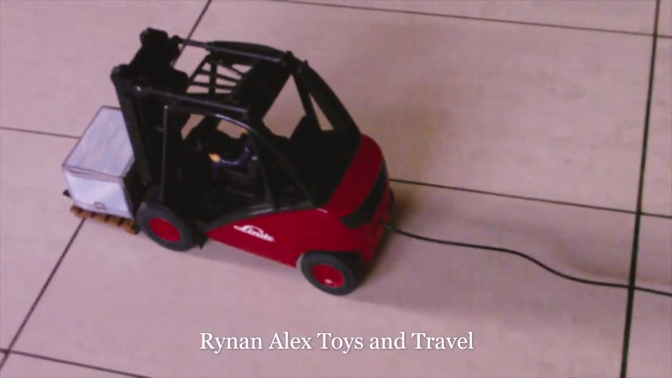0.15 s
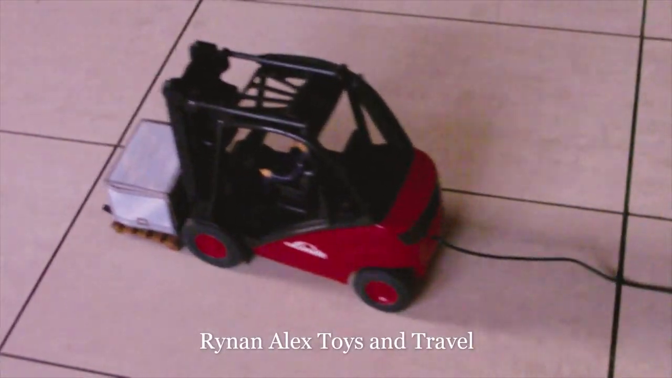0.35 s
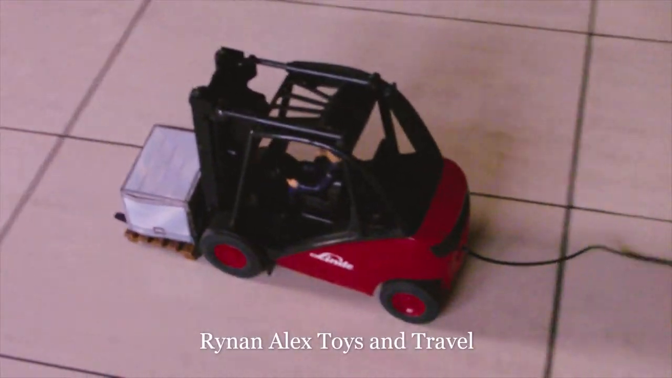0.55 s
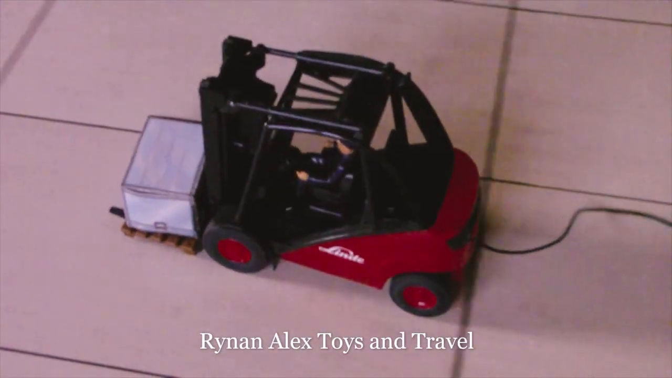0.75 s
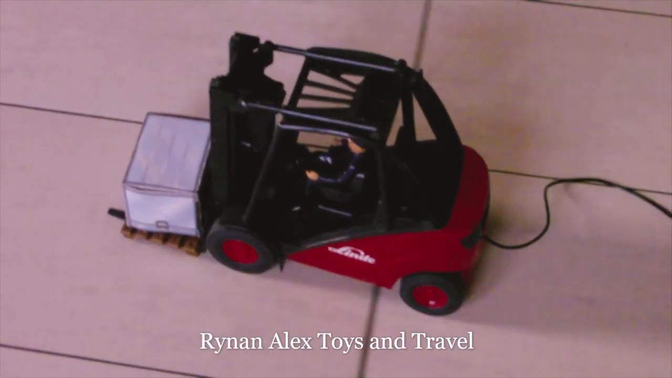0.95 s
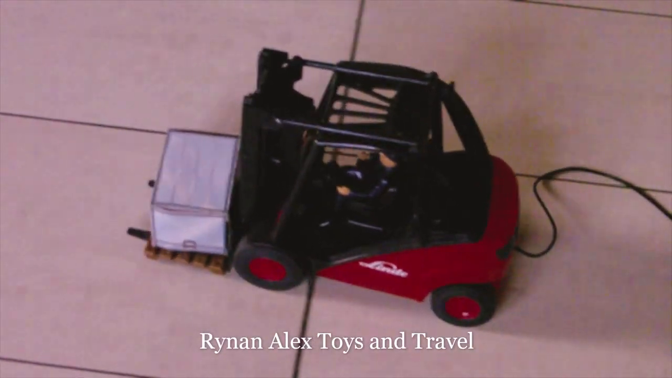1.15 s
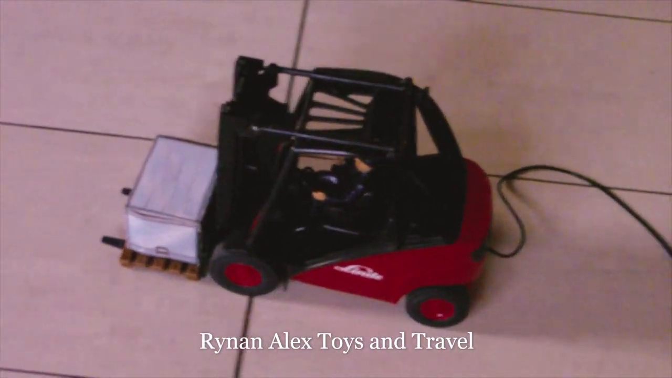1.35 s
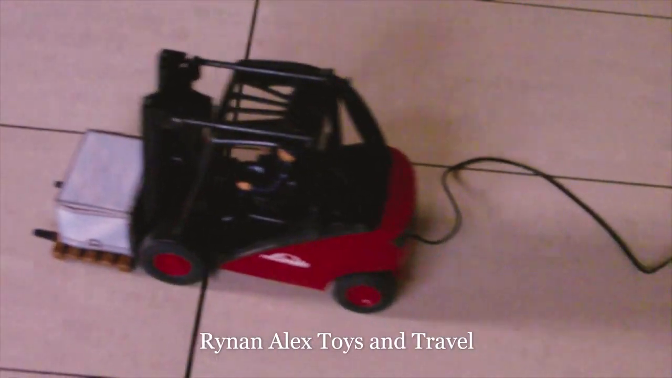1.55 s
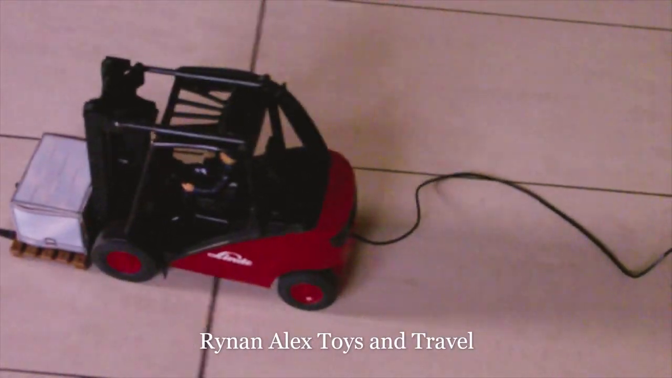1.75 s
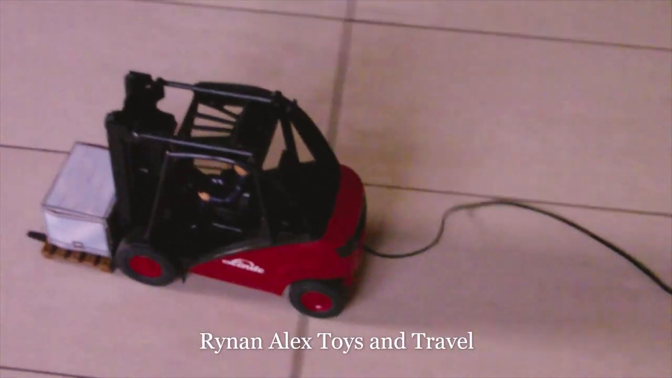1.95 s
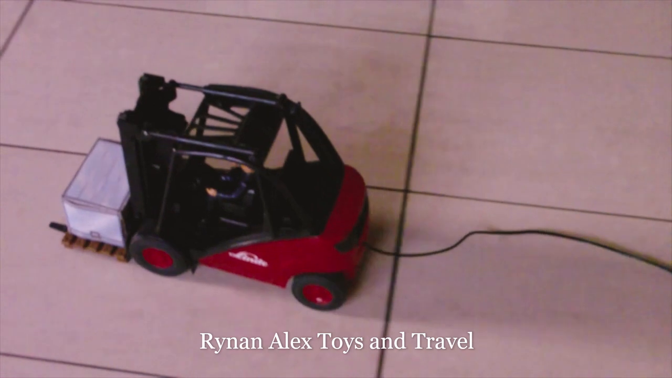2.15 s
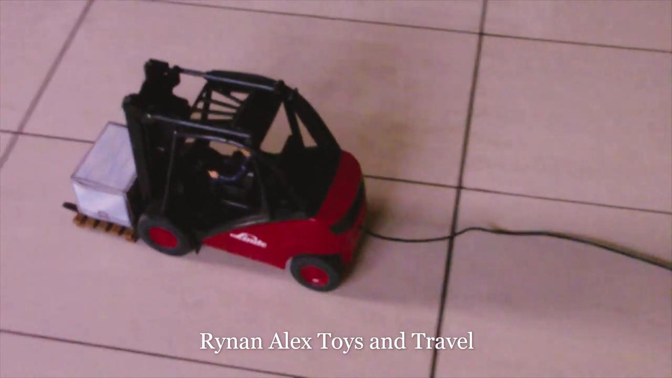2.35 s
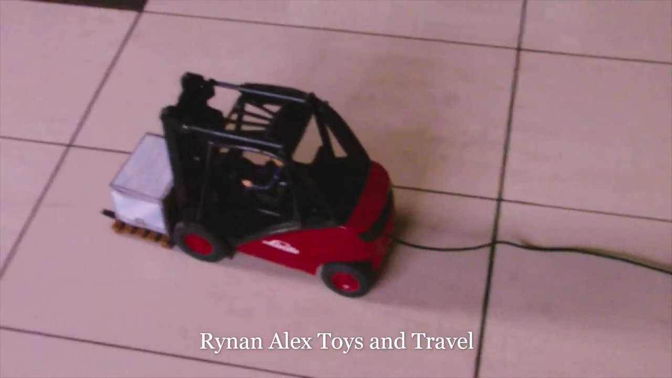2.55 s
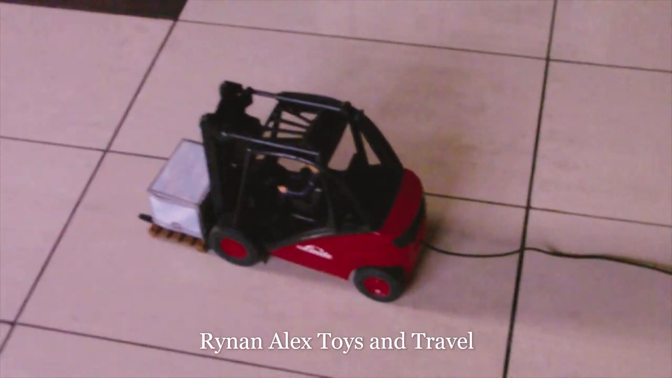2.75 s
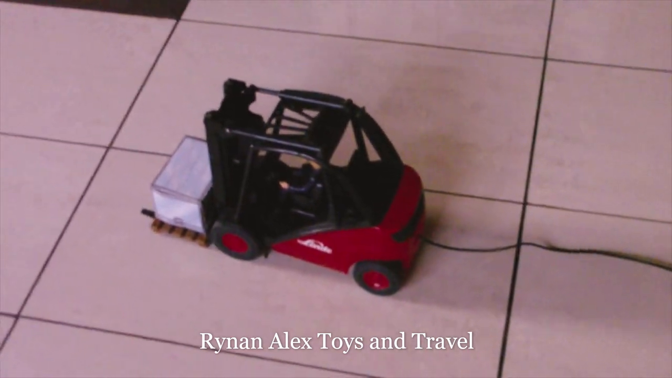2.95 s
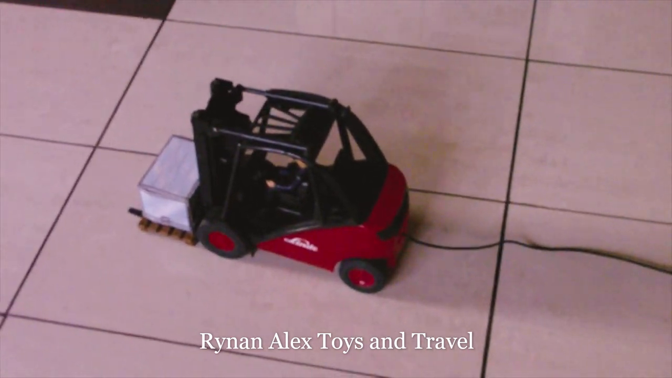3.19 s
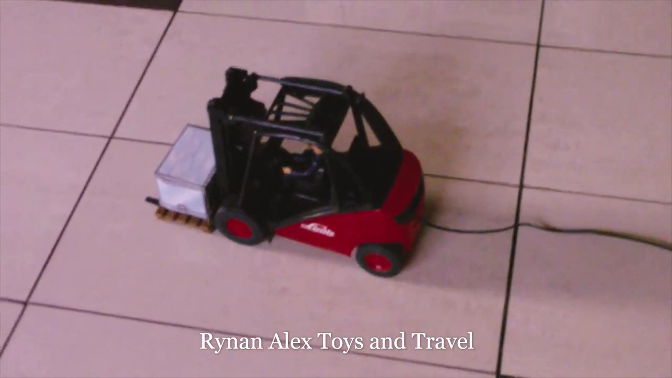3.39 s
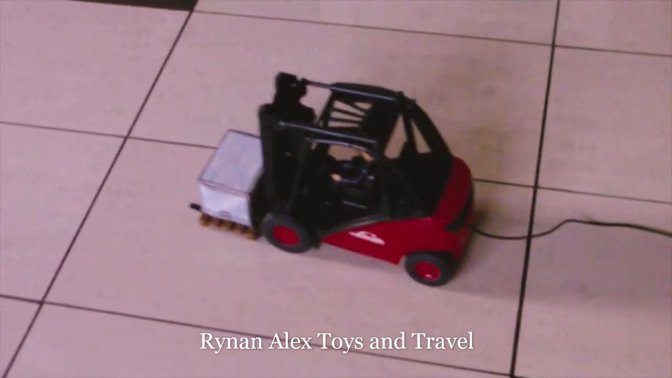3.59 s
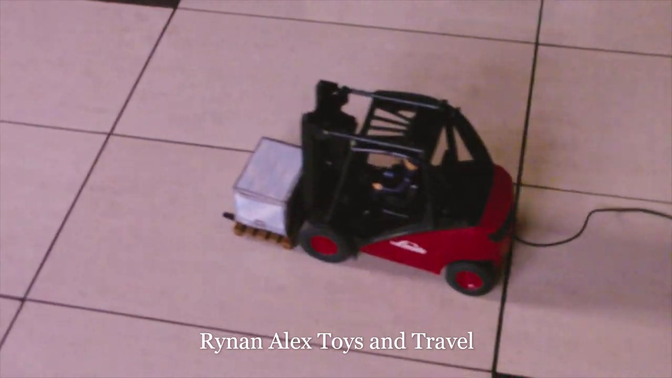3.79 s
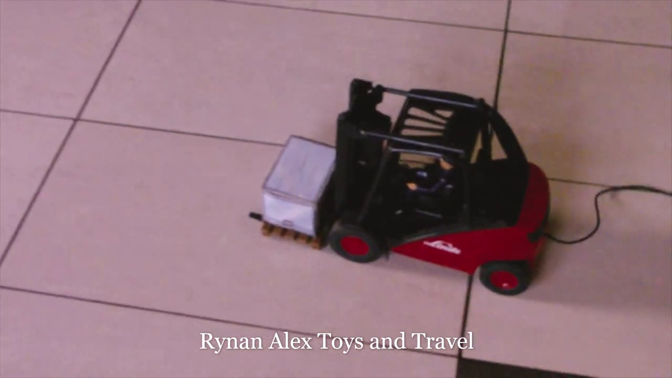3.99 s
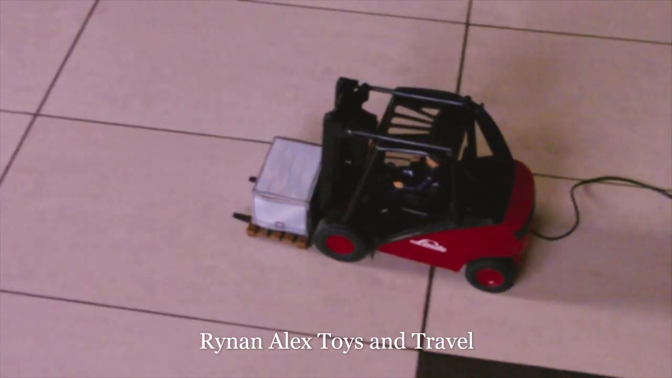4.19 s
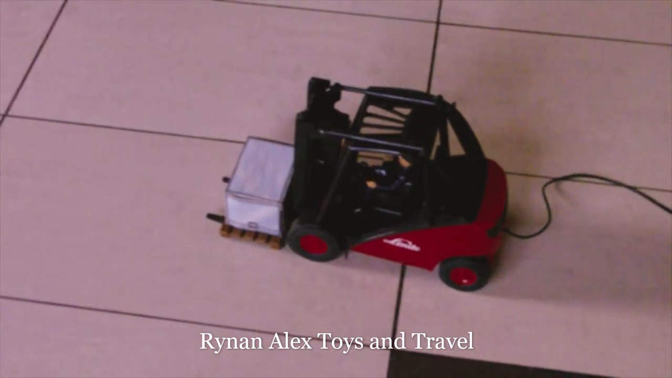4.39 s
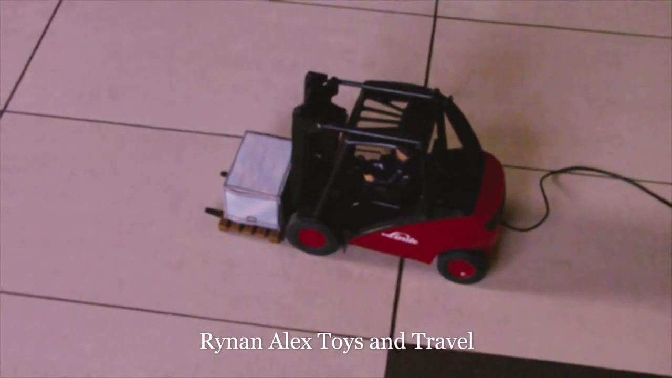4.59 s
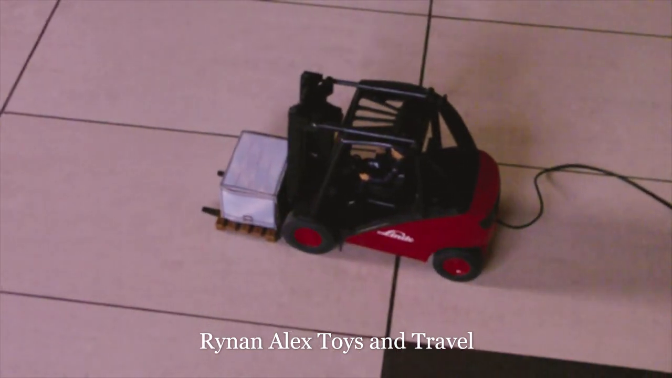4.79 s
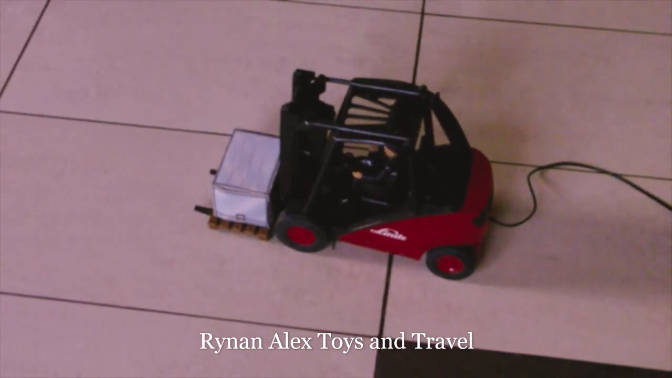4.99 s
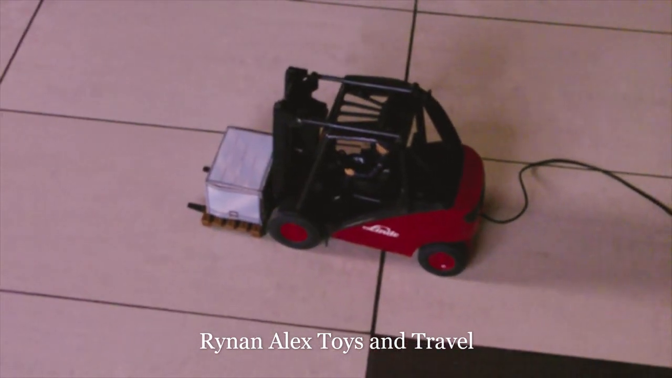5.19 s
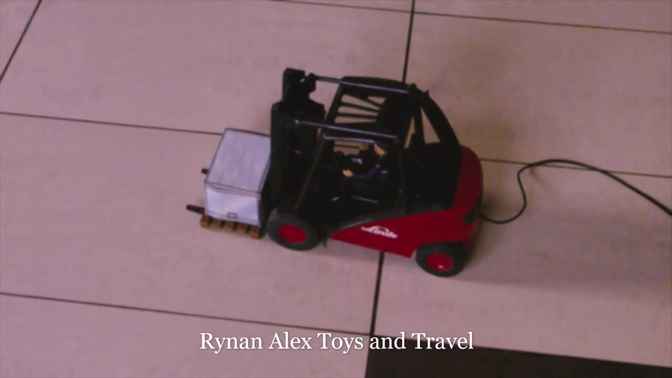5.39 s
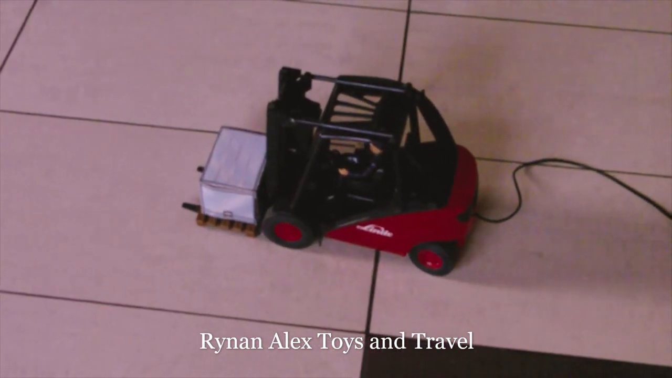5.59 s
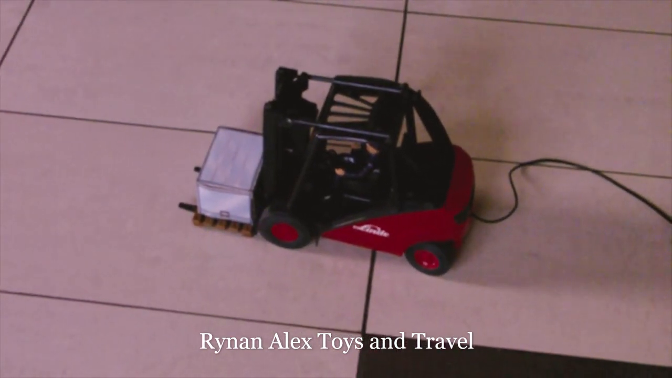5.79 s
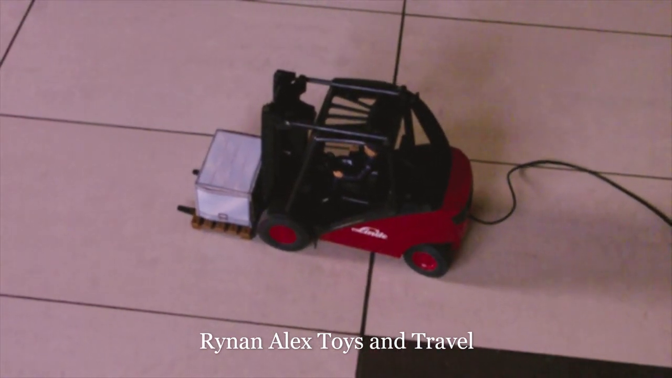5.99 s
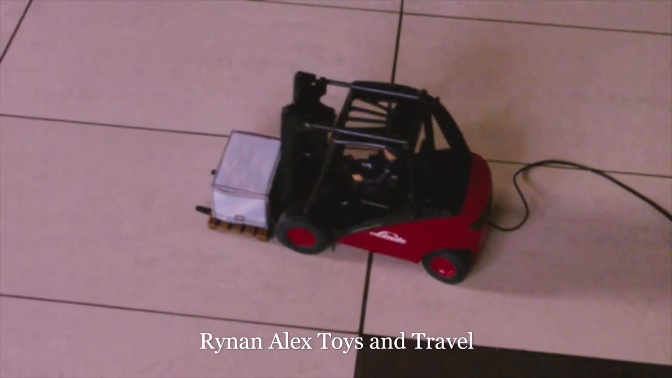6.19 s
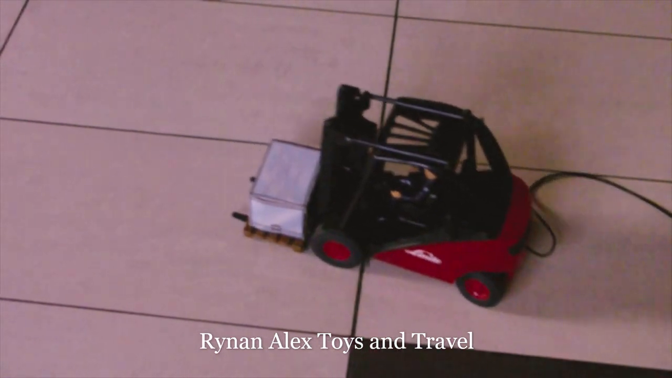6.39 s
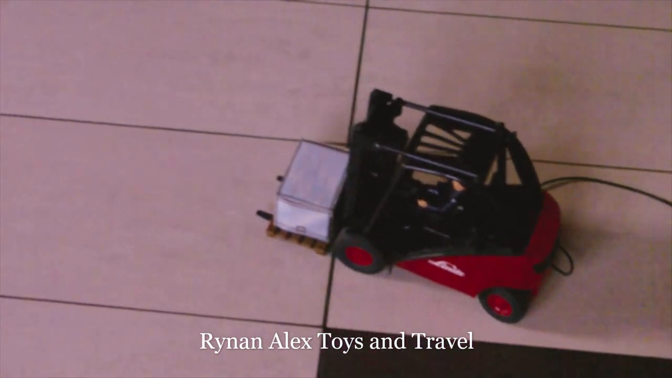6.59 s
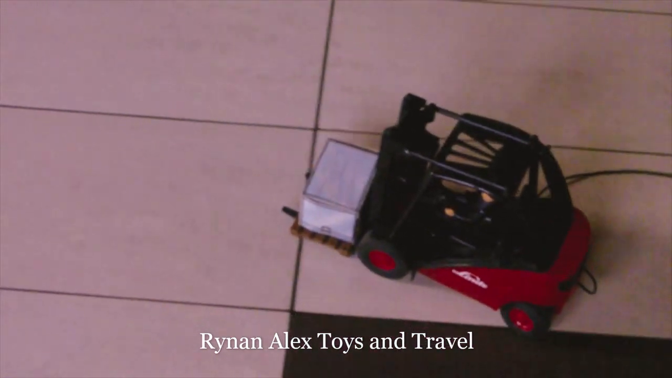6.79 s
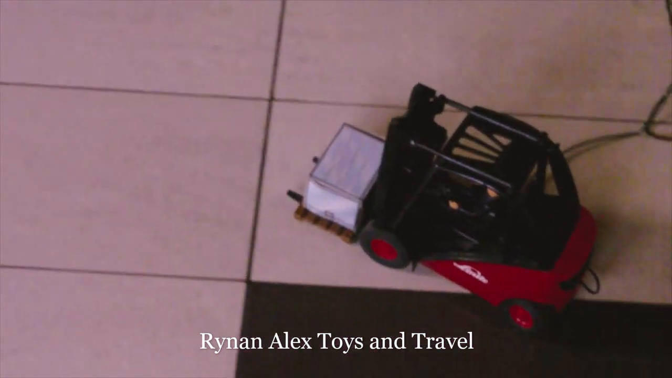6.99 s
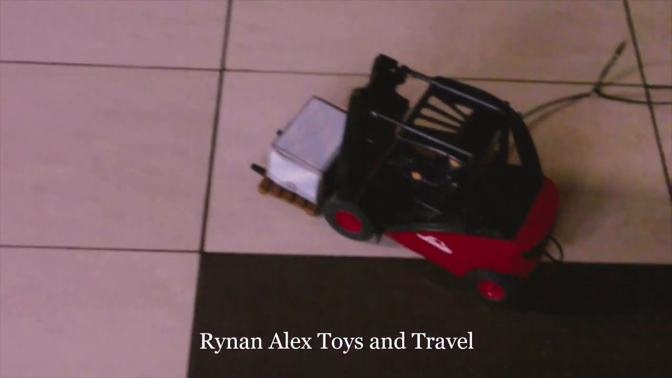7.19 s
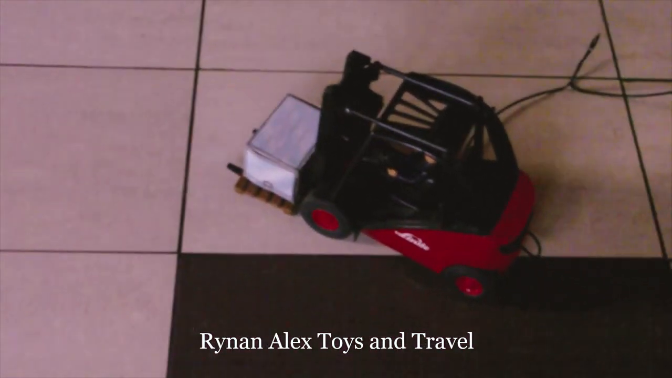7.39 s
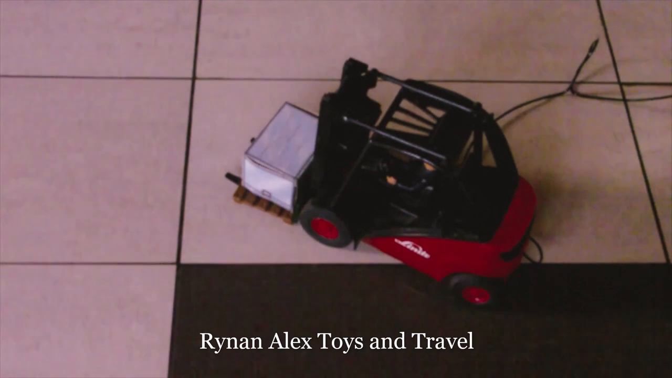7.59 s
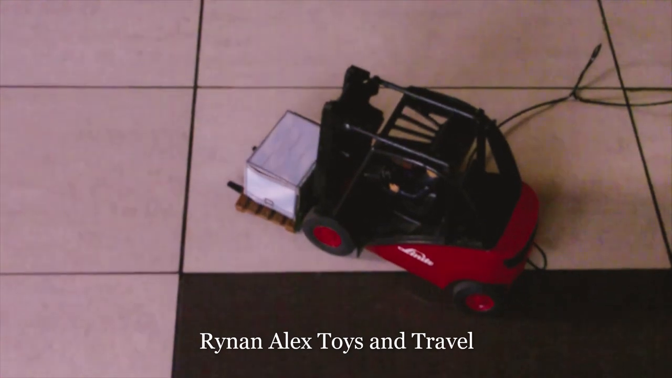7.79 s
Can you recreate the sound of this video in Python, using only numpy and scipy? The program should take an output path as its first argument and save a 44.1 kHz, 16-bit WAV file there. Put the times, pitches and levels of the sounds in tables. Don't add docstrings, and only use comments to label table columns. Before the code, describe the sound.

A toy forklift runs close to a small camera on a tiled floor, in a room with a short tail. From 0 to about 1.3 seconds its gear motor grinds and whines upward, with plastic jolts near 0.7 and a cluster of bright clacks, a low thud and short squeaks around 1.0 to 1.2, before sagging away. A second run with a different gritty tone goes from 1.4 to 2.5. After a pause, a knock at 3.35 starts a short rising whir, which coasts down by 4.3 with small jolts. At rest, a faint low push touches the camera near 5.1, and a knock with bright rattle follows at 5.4. The last, lower whir runs from 6.0 to 7.2, rattling near 6.6 and 6.9 and settling dully at 7.1; a small tick and rattle come at 7.5. Low electrical buzz, hiss, faint high whistles and tiny focus ticks persist.

```python
import sys
import numpy as np
from scipy import signal
from scipy.fft import rfft, irfft, next_fast_len
from scipy.io import wavfile
from scipy.ndimage import uniform_filter1d

SR = 44100
rng = np.random.default_rng(int(sys.argv[2]) if len(sys.argv) > 2 else 0)


def voltage_ratio(decibels):
    exponent = np.asarray(decibels, float) / 20
    return 10 ** exponent


def to_wav(sig):
    pcm = np.clip(np.atleast_2d(sig), -1, 1) * 32767
    pcm = np.round(pcm).astype(np.int16)
    wavfile.write(sys.argv[1], SR, pcm.T)


N = 346185

# gears bite [s], power off [s], top tooth mesh [Hz], spin-up time [s],
# whine level [dB].
BURSTS = [
    (-.063, 1.075, 2144, 0.38, 0),
    (1.407, 2.21, 2110, 0.32, -4),
    (3.351, 3.93, 2099, .31, -0.1),
    (6.039, 6.85, 1868, .26, 1),
]
# time [s], level [dB].
GRIND = [
    [(0.0, -34.5), (.178, -29.5), (.66, -27), (.95, -26.5), (1.01, -25), (1.12, -26), (1.286, -33.5),
     (1.372, -44), (1.4, -45)],
    [(1.38, -45), (1.43, -32), (1.465, -31.5), (1.59, -30), (1.7, -28.5), (2.22, -27), (2.374, -32),
     (2.5, -39.5), (2.65, -64)],
    [(3.3, -50), (3.34, -40.5), (3.352, -38), (3.42, -35), (3.658, -29), (3.93, -28.5), (4.04, -30),
     (4.16, -38.5), (4.34, -57)],
    [(5.94, -61), (5.99, -38), (6.07, -31.5), (6.184, -30.5), (6.5, -30), (6.6, -28), (6.95, -30.5),
     (7.132, -40), (7.25, -60)],
]
MESH_ORDERS = [1, 2, 4 / 3, 3, 4]
# frequency [Hz], level [dB per Hz].
COLOUR_BACK = [(88, -51), (150, -25), (248, 7.5), (571, -9.5), (778, -8.5), (963, -5), (1530, 1), (2210, 1),
               (3200, -1), (4900, -11), (5500, -5.5), (9460, -18), (15400, -22)]
COLOUR_AHEAD = [(88, -44), (150, -28), (204, -40), (234, -43), (352, -22.5), (654, -21.5), (874, -1.5),
                (1060, -7), (1590, -6), (2640, -5), (9100, -13.5), (11500, -22.5), (15400, -18)]
# centre [Hz], width [Hz], lift [dB].
SHELL_BACK = [(268, 48, -7.5), (460, 79, 8.5), (780, 167, 11), (1278, 160, 4.5), (1464, 45, 4.5),
              (1815, 360, 1), (2825, 740, 5), (4190, 54, 7), (4600, 340, 4), (5550, 770, 3),
              (6660, 270, 3.5), (9300, 540, 7), (10970, 450, 2.5)]
SHELL_AHEAD = [(300, 110, 10.5), (880, 19, 8), (1487, 30, 7.5), (1790, 100, 2.5), (2700, 71, 5),
               (3640, 110, -2), (5000, 170, -6), (5700, 450, 3), (8300, 160, -14), (10000, 350, 1.5),
               (11300, 400, 11.5)]
MAST = [(300, 14, -0.5), (516, 64, -6), (754, 140, 3.5), (1140, 120, 0.5), (1490, 120, -4.5),
        (2760, 230, 2), (3660, 350, 2), (6060, 170, 3)]
# tooth mesh [Hz], mesh tone [dB], its octave [dB above the grind].
WHINE_BACK = [(550, -17, -25), (750, -22, -8.5), (1000, -13, 0.5), (1160, -5.5, -1.5), (1280, 0, -3),
              (1550, -0.5, -2.5), (1740, -4.5, -8.5), (1880, -9, -14), (1990, -1.5, -18), (2080, -2.5, -11)]
WHINE_AHEAD = [(500, -18, -22), (810, -23, -10), (1084, -15, 12), (1300, -16, -11), (1440, 5.5, 5),
               (1680, -5.5, 1.5), (1850, 2, -8), (1920, .5, -4)]
# time [s], half width [s], drone lift [dB], rumble lift [dB].
JOINTS = [(.01, 0.084, 7, 10), (.33, 0.1, -1, 2.5), (1.39, 0.029, 3, 12), (.66, 0.16, 10, 13.5),
          (1.04, 0.21, 6.5, 13), (3.4, 0.064, 4, 15), (3.9, 0.13, 7, 3), (6.059, 0.026, 22.5, -3),
          (6.6, 0.17, 11, 2), (6.85, 0.089, 6.5, 9), (7.11, .04, -3, 14)]
# start [s], length [s], pitch [Hz], level [dB rms].
SQUEALS = [(0, 0.048, 1740, -38.5), (0.773, 0.3, 2057, -37.5), (.94, 0.11, 4180, -32),
           (1.049, .03, 4550, -25.5), (1.074, 0.031, 2700, -27), (1.139, 0.04, 2080, -32),
           (1.452, 0.031, 2700, -32.5), (1.628, 0.062, 2700, -26.5), (3.352, 0.19, 1627, -40),
           (3.355, 0.11, 2120, -41.5), (3.489, 0.09, 2040, -35.5), (3.466, 0.16, 4060, -50),
           (3.922, .03, 2510, -31.5), (5.365, 0.068, 1500, -41), (6.013, 0.047, 2280, -42),
           (6.574, 0.063, 3430, -36), (6.89, 0.062, 2160, -38), (6.909, 0.064, 3930, -34)]
# start [s], peak [dB], brightness [dB per octave], loudest ring [Hz].
JOLTS = [(.518, -18, -6, 780), (.578, -32, -7, 780), (.633, -26, -4, 784), (.672, -11.5, -5, 830),
         (.911, -30, -5, 780), (.993, -15, -1, 780), (1.059, -17, -1, 4540), (1.159, -16, -2, 4230),
         (3.845, -19, 1, 880), (4.015, -25, -7, 907), (5.96, -39, 5, 5000), (6.035, -35, -11, 800),
         (6.531, -23.5, -25, 300), (6.59, -18, -2, 5300), (6.627, -16.5, -7.5, 830), (6.862, -25, -4, 720),
         (6.955, -21, 1, 2780)]
# start [s], peak [dB], brightness [dB per octave], loudest ring [Hz],
# rattle t60 [s].
SETTLING = [
    (1.028, -16.5, -12, 318, 0.13),
    (1.046, -25.5, -20, 780, 0.35),
    (3.345, -26, -2.5, 1595, 0.11),
    (3.371, -37, -6, 2150, 0.4),
    (5.361, -22.5, -8.5, 561, .26),
    (5.392, -25.5, -9, 1530, 0.4),
    (7.103, -29.5, -18, 433, 0.19),
    (7.517, -30.5, -3, 1550, 0.066),
    (7.524, -26.5, -7, 452, 0.39),
]
# frequency [Hz], t60 [s].
ROOM = [(200, 0.13), (1000, 0.87), (4000, 0.32), (12000, 0.26)]
# frequency [Hz], then left-right likeness [0 to 1], left's lead [radians]
# or left minus right [dB].
TOY_SAME = [(200, .98), (1000, .975), (2000, .992), (3500, .992), (5500, .82), (8000, .42), (11000, .15),
            (15000, .02)]
LEFT_LEAD = [(100, 0), (4000, -.04), (7200, -.4), (9000, -1), (15000, -1.2)]
LEFT_DB = [(100, 0), (300, 1.5), (700, 2), (1300, 1), (2400, 0), (5000, 2.5), (9000, 2), (15000, -1)]
FOCUS_EXTRA = [0.257, .5195, .7849, 1.0508, 1.322, 1.451, 1.7207, 1.9897, 2.525, 2.6509, 3.189, 3.3205,
               3.5943, 4.26, 4.652, 4.921, 5.1916, 5.335, 5.8605, 6.124, 6.257, 6.392, 6.655, 6.922, 7.1883,
               7.3237, 7.7307]
# time into the frame [ms], step [thousandths].
FRAME_STEPS = [(3.7, 10), (11.6, 4), (12.8, -9), (24.3, 9), (25.3, -13), (30, -5)]
# pitch [Hz], level [dB rms].
WHISTLES = [(3933.2, -65), (7866.4, -69), (11799.6, -88)]
# frequency [Hz], level [dB per Hz].
HISS = [(8.8, -43), (15, 4), (250, -20.5), (297, -17.5), (670, -23), (3030, -31.5), (4040, -32),
        (4410, -32.5), (7220, -36), (7880, -36), (15400, -37.5)]
# frequency [Hz], likeness [0 to 1].
HISS_SAME = [(60, .975), (600, .92), (3000, .75), (7000, .35), (15000, .05)]

CREEP_HZ, RUNNING_HZ = 398.7, 970
SPIN_DOWN_S, LET_GO_S, LONGEST_S = .31, 0.019, 1.42
LOW_BACK, LOW_AHEAD = (-13, 0.97, -20), (1.5, -38, -14)
JOLT_T60 = 0.12
FIELD_HZ, FRAME_HZ = 59.826, 29.97


def evened(x):
    return x / np.sqrt(np.mean(x ** 2) + 1e-20)


def read(points, hz):
    f, value = np.transpose(points)
    return np.interp(np.log(hz + 1), np.log(f + 1), value)


def add(mix, s, sound):
    part = mix[round(s * SR):][:len(sound)]
    part += sound[:len(part)]


def shaped(x, gain):
    size = next_fast_len(x.shape[-1])
    return irfft(rfft(x, size) * gain(np.fft.rfftfreq(size, 1 / SR)), size)[..., :x.shape[-1]]


def drift(size, hz):
    return evened(shaped(rng.standard_normal(size), lambda f: 1 / (1 + (f / hz) ** 2)))


def ring(modes, hz):
    return voltage_ratio(sum(db / (1 + (2 * (hz - centre) / width) ** 2) for centre, width, db in modes))


def tail(longer=1):
    hz, t, z = signal.stft(rng.standard_normal(SR // 2), SR, nperseg=256)
    decay = voltage_ratio(-60 * t / (longer * read(ROOM, hz)[:, None]))
    x = signal.istft(z * decay, SR, nperseg=256)[1]
    return x / np.linalg.norm(x)


def burst(press, grind_points, colour, shell, low, radiated):
    t, driven_hz, mesh_hz, grind_db, coasting = motor(press, grind_points)
    slow = np.clip(1.6 - mesh_hz / 1500, 0, 1)
    out = voltage_ratio(-8 - 6 * slow) * pings(len(t))
    out += grind(t, driven_hz, coasting, slow, colour, shell, low)
    tone = whine(mesh_hz, coasting, slow, press[-1], shell, radiated)
    out += .95 * tone + .3 * signal.oaconvolve(tone, tail(longer=.2))[:len(t)]
    return t[0], voltage_ratio(grind_db - 3.5) * out * signal.windows.tukey(len(t), .003)


def motor(press, grind_points):
    bite, off, top_hz, spin_up, _ = press
    s, db = np.transpose(grind_points)
    t = s[0] + np.arange(0, LONGEST_S, 1 / SR)
    coasting = np.maximum(t - off, 0)
    short_of_top = (top_hz - CREEP_HZ) * np.exp((bite - t + coasting) / spin_up)
    driven_hz = np.maximum(top_hz - short_of_top, CREEP_HZ)
    mesh_hz = driven_hz * np.exp(-coasting / SPIN_DOWN_S)
    grind_db = np.interp(t, s, db) - 1000 * np.maximum(t - s[-1], 0)
    return t, driven_hz, mesh_hz, grind_db, coasting


def grind(t, driven_hz, coasting, slow, colour, shell, low):
    size = len(t)
    hits = voltage_ratio(3 * np.minimum(rng.exponential(1, size), 4)) * (rng.random(size) < 1500 / SR)
    chatter = hits * rng.choice([-1, 1], size)
    scrape = 1.05 * rng.standard_normal(size) + 0.46 * evened(chatter)
    scrape *= voltage_ratio(1.03 * drift(size, 9.2) + 1.76 * drift(size, 102.0))
    body = shaped(scrape, lambda f: voltage_ratio(read(colour, f)) * ring(shell, f))

    creep = np.clip((RUNNING_HZ - driven_hz) / (RUNNING_HZ - CREEP_HZ), 0, 1)
    fizz_db = 0.5 - 9.5 * creep - np.minimum(36 * coasting, 11)
    top_db = 4.6 + 2.05 * slow
    drone_lift, rumble_lift = sum(np.outer(lift, np.exp(-((t - s) / width) ** 2)) for s, width, *lift in JOINTS)
    drone, coast_change, rumble = low
    drone_db = drone + coast_change * np.minimum(coasting / SPIN_DOWN_S * 2, 1) - 13.5 * creep + drone_lift
    bands = [(1050, 4000, 0), (4000, 8500, fizz_db - 1), (8500, 16000, fizz_db - top_db),
             (600, 1050, drone_db), (200, 600, rumble + rumble_lift)]
    out = 0
    for lo, hi, db in bands:
        band = shaped(body, lambda f: ((1 + (lo / (f + 1)) ** 16) * (1 + (f / hi) ** 16)) ** -.5)
        out = out + voltage_ratio(db) * evened(band)
    return out


def whine(mesh_hz, coasting, slow, press_db, shell, radiated):
    size = len(mesh_hz)
    free = np.minimum(coasting / LET_GO_S, 1)
    hz, *columns = np.transpose(radiated)
    tone_db = []
    for column in columns:
        loaded_db = np.interp(mesh_hz, hz, column) + press_db
        tone_db.append((1 - free) * loaded_db + free * -19)
    loose_fade = np.clip(106 * (coasting - LET_GO_S), 0, 25)
    tone_db.append(2 - 40 * (1 - free) - loose_fade)
    tone_db += [tone_db[1] - 12 + 9 * slow, tone_db[1] - 15 + 10 * slow]
    out = 0
    for order, db in zip(MESH_ORDERS, tone_db):
        wobble = .024 * order ** .3 * drift(size, 130)
        turns = np.cumsum(order * mesh_hz * (1 + wobble)) / SR
        out = out + voltage_ratio(db + 1.5 + 4 * drift(size, 90)) * np.sin(2 * np.pi * turns)
    return shaped(out, lambda f: ring(shell, f) * voltage_ratio(-2.5))


def pings(size):
    out, t = np.zeros(size), np.arange(900) / SR
    for hz, decay in zip(np.geomspace(1100, 7500, 24), rng.uniform(0.0041, 0.007, 24)):
        hits = voltage_ratio(3.0 * np.minimum(rng.exponential(1, size), 3)) * (rng.random(size) < 9 / SR)
        ping = np.sin(2 * np.pi * hz * t) * t * np.exp(-t / decay) / decay
        out += signal.oaconvolve(hits, ping)[:size]
    return evened(out)


def squeals():
    out = np.zeros(N)
    for s, length, hz, db in SQUEALS:
        size = round(length * SR)
        turns = np.cumsum(hz * (1 + .012 * drift(size, 120))) / SR
        level = voltage_ratio(db + 1.5 + 3.5 * drift(size, 80))
        add(out, s, level * np.sin(2 * np.pi * turns) * signal.windows.tukey(size, .5))
    return out


def knocks():
    out, t = np.zeros(N), np.arange(SR // 2) / SR
    events = [(*jolt, JOLT_T60) for jolt in JOLTS] + list(SETTLING)
    for s, db, slope_db, hz, t60 in events:
        modes = list(MAST) + [(hz, .04 * hz, 15)]

        def colour(f):
            tilt = voltage_ratio(slope_db * np.log2(f / 1500 + 0.64))
            return ring(modes, f) * tilt / (1 + (260 / (f + 1)) ** 6) / (1 + (f / 8000) ** 3)

        rattle = shaped(rng.standard_normal(len(t)), colour) * voltage_ratio(-60 * t / t60)
        jolt = shaped(rng.standard_normal(len(t)), lambda f: colour(f) * np.sqrt(f / 1000 + 1))
        jolt *= voltage_ratio(-60 * t / 0.093)
        sound = (rattle + 1.2 * jolt) * np.minimum(t / .008, 1) ** 1.5
        add(out, s, voltage_ratio(db) * sound / abs(sound).max())
    return out + voltage_ratio(-15.0) * signal.oaconvolve(out, tail())[:N]


def likeness(points, f):
    same = np.clip(read(points, f), 0, 1)
    return same, np.sqrt(1 - same ** 2)


def ports(x):
    other = signal.oaconvolve(x, tail(longer=.5))[:N]
    right = shaped(x, lambda f: likeness(TOY_SAME, f)[0] * np.exp(-1j * read(LEFT_LEAD, f)))
    right += shaped(other, lambda f: likeness(TOY_SAME, f)[1])
    left = shaped(x, lambda f: voltage_ratio(read(LEFT_DB, f) / 2))
    return np.array([left, shaped(right, lambda f: voltage_ratio(-read(LEFT_DB, f) / 2))])


def focus():
    out, t = np.zeros(N), np.arange(4000) / SR
    tones = np.sin(2 * np.pi * (5600 - 250000 * t) * t) + 0.52 * np.sin(2 * np.pi * 10500 * t)
    chirp = tones * np.interp(t, [0, .0005, .0017, .0021], [0, 1, 1, 0])
    current = np.interp(t, [0, .0018, .018, .031], [0, 1.17, 0.92, 0.24])
    sag = signal.lfilter([1, -1], [1, -np.exp(-1 / (0.014 * SR))], current)
    beat = np.arange(.05, N / SR, 4 / FRAME_HZ)
    beat = beat[(beat < 7.35) | (beat > 7.6)]
    steps = np.append(beat + .002 * rng.standard_normal(len(beat)), FOCUS_EXTRA)
    for s, (late, db) in zip(steps, rng.standard_normal((len(steps), 2))):
        add(out, s, voltage_ratio(-50.0) * chirp + voltage_ratio(-39.0) * sag)
        scratch = rng.standard_normal(49) * np.hanning(49)
        add(out, s + .012 + .001 * late, voltage_ratio(-51 + 3 * db) * scratch)
    return out


def handling():
    t = np.arange(N) / SR - 5.095
    return voltage_ratio(-35.5) * np.sin(2 * np.pi * 10.0 * t) * np.exp(-(t / 0.082) ** 2)


def buzz():
    ms = np.arange(N) * 1000 / SR
    dips = -1. * (abs((ms - 11.2 + 4) % (1000 / FIELD_HZ) - 4) < .75)
    steps = sum(size * np.exp(-((ms - at) % (1000 / FRAME_HZ)) / 1.86) for at, size in FRAME_STEPS)
    steps += 1.85 * np.cos(2 * np.pi * FRAME_HZ * (ms - 1.5) / 1000)
    both = voltage_ratio(-41.0) * (dips - dips.mean()) + voltage_ratio(-61.0) * (steps - steps.mean())
    return uniform_filter1d(both * voltage_ratio(1.2 * drift(N, 44.0)), size=8)


def hiss():
    a, b = shaped(rng.standard_normal((2, N)), lambda f: voltage_ratio(read(HISS, f)))
    right = shaped(a, lambda f: likeness(HISS_SAME, f)[0]) + shaped(b, lambda f: likeness(HISS_SAME, f)[1])
    t = np.arange(N) / SR
    whistles = sum(voltage_ratio(db) * np.sqrt(2) * np.sin(2 * np.pi * hz * t) for hz, db in WHISTLES)
    return voltage_ratio(-49) * evened(np.array([a, right])) + whistles


def scene():
    toy = knocks()
    back = (COLOUR_BACK, SHELL_BACK, LOW_BACK, WHINE_BACK)
    ahead = (COLOUR_AHEAD, SHELL_AHEAD, LOW_AHEAD, WHINE_AHEAD)
    for press, grind_points, gear in zip(BURSTS, GRIND, [back, ahead, back, back]):
        add(toy, *burst(press, grind_points, *gear))
    toy = shaped(toy + squeals(), lambda f: 1 / (1 + (f / 14300) ** 12))
    return ports(toy) + buzz() + focus() + handling() + hiss()


def roll_off(x):
    return signal.sosfilt(signal.butter(12, 15500, fs=SR, output="sos"), x)


def record(dry):
    limited = shaped(dry, lambda f: 1 / (1 + (f / 15300) ** 200))
    return roll_off(limited)


dry = scene()
out = record(dry)
to_wav(out)
```